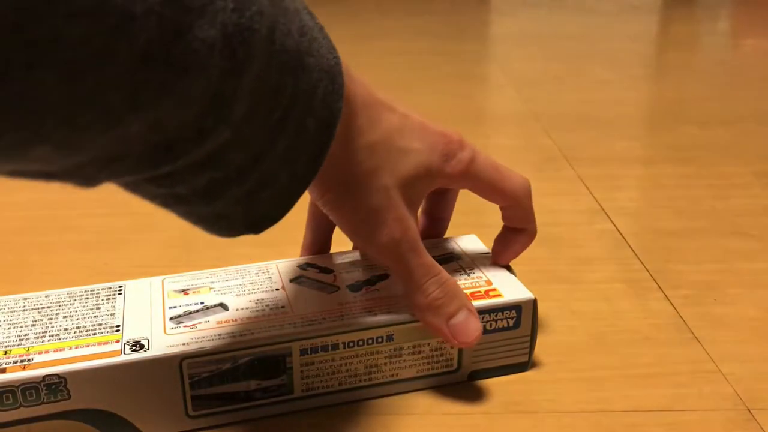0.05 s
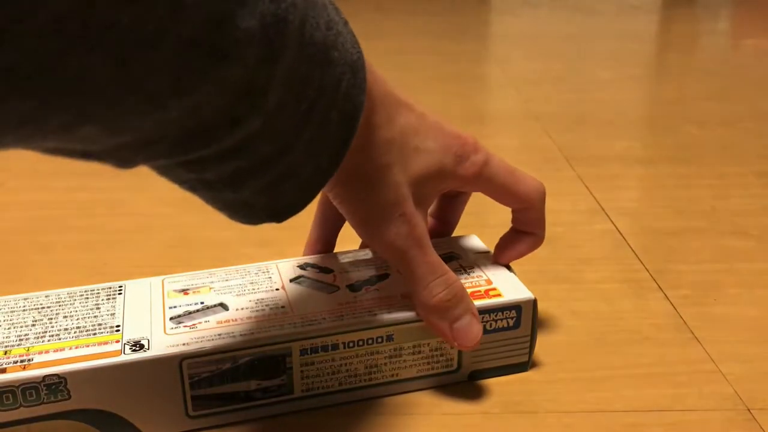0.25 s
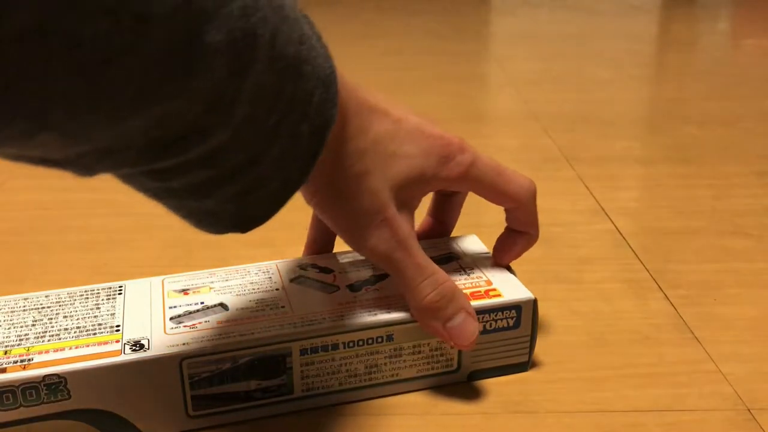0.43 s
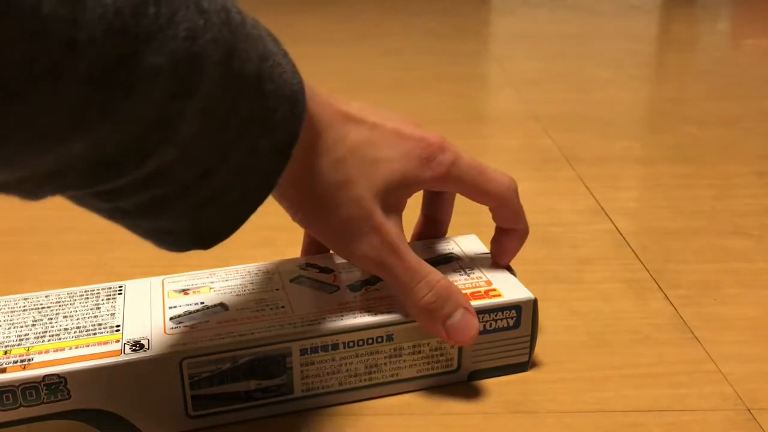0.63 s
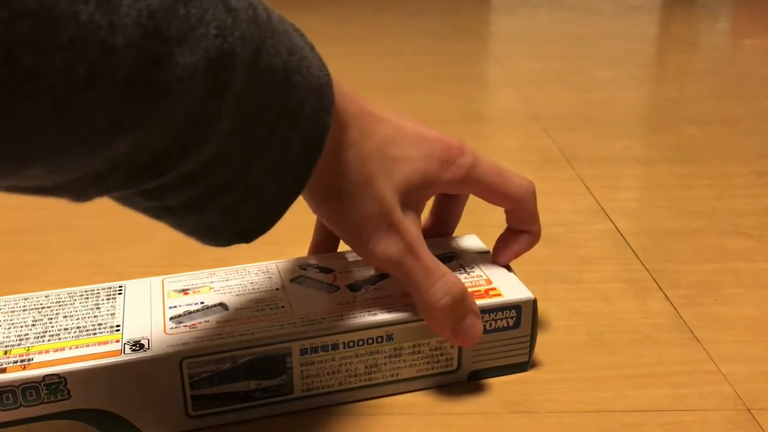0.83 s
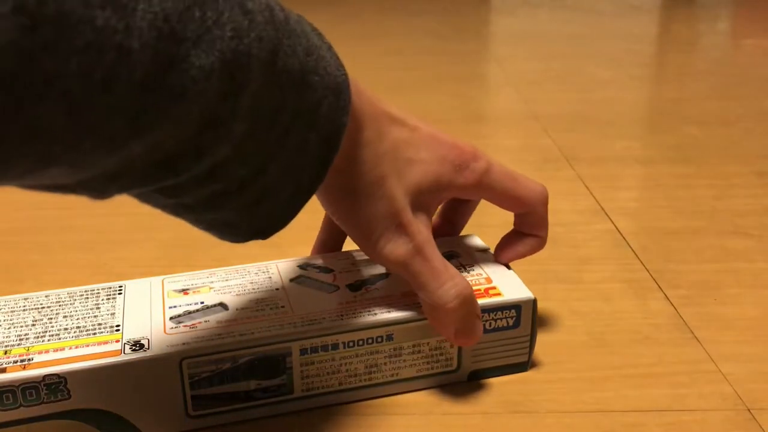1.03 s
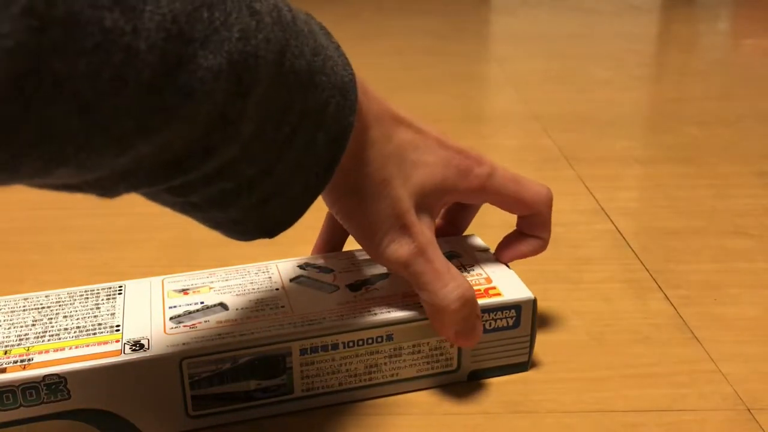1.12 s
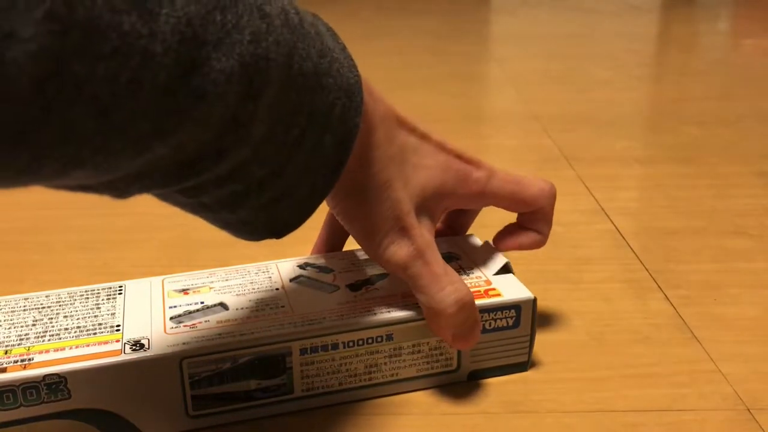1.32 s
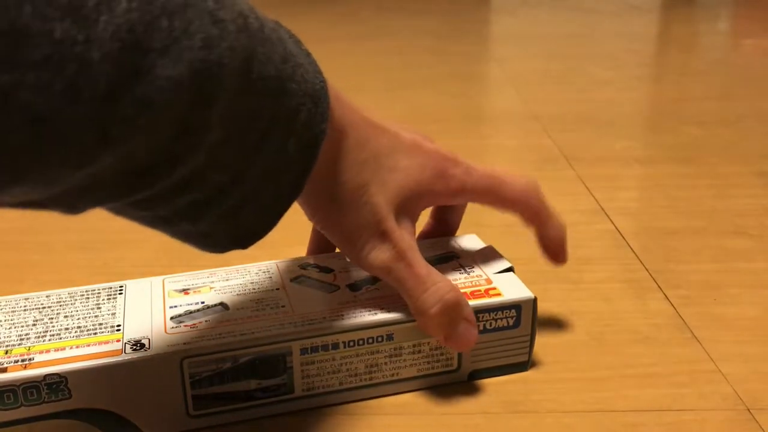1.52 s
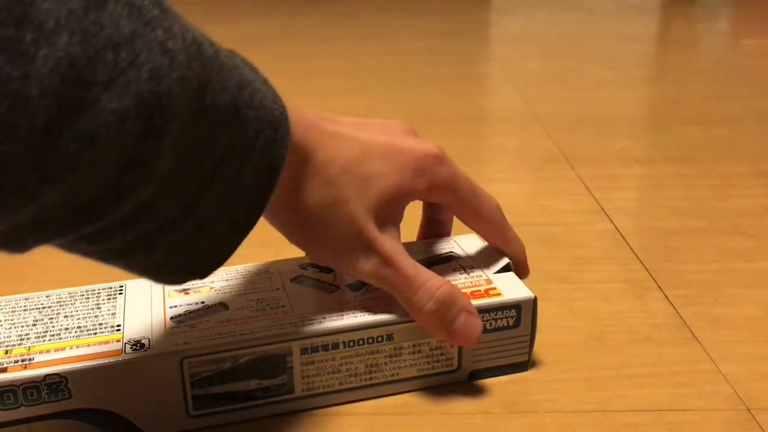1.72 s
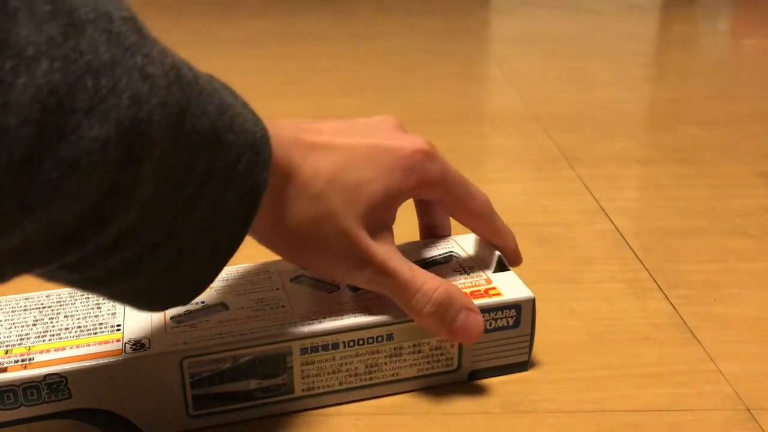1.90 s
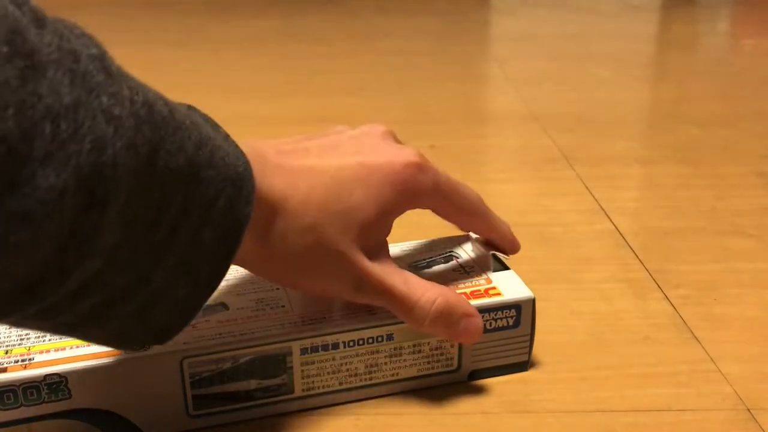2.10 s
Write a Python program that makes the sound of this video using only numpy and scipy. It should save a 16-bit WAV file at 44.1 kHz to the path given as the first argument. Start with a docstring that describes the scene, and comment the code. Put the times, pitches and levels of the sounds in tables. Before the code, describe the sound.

A perforated cardboard tab tears in a quick run of sharp, dry snaps under a thumb. It gives way with a hollow knock, then a finger faintly rubs and flicks the flap, close up in a quiet room.

```python
"""Opening a perforated cardboard tab

A thumb presses in the tab of a cardboard box on a wooden floor in a quiet room.
Fibres tick and the paper bridges snap one after another, each a bright burst ringing in the card.
The tab gives way and knocks the hollow box, then a finger slides along the flap and flicks it up.
A short room tail follows each sound, over faint air and low rumble."""
import sys
import numpy as np
from scipy import signal
from scipy.fft import rfft, irfft
from scipy.io import wavfile
from scipy.ndimage import uniform_filter1d, map_coordinates

SR = 44100
rng = np.random.default_rng(int(sys.argv[2]) if len(sys.argv) > 2 else 0)


def digitize_waveform(pressure):
    """Quantize a signal to 16-bit integers and store it at the path in sys.argv[1].

    Rows of a 2-D input are taken as channels; values are limited to [-1, 1].
    """
    field = np.atleast_2d(pressure).T
    bounded = np.clip(field, -1, 1)
    quanta = np.round(bounded * 32767).astype(np.int16)
    wavfile.write(sys.argv[1], SR, quanta)


N = 94815


def amp(db):
    """Decibels to gain."""
    return 10 ** (np.asarray(db) / 20)


def curve_at(points, hz):
    """A curve of (hz, value) points, read on a log-frequency axis."""
    point_hz, value = np.transpose(points)
    return np.interp(np.log(hz + 1), np.log(point_hz + 1), value)


def add(mix, start_s, sound):
    """Lays a sound into the mix."""
    part = mix[round(start_s * SR):][:len(sound)]
    part += sound[:len(part)]


def bins(size=2048):
    """The frequencies of a spectrum, in Hz."""
    return np.fft.rfftfreq(size, 1 / SR)


def noise(eq):
    """Steady noise shaped by an EQ curve, at rms 1."""
    shaped = irfft(rfft(rng.standard_normal(N)) * amp(curve_at(eq, bins(N))), N)
    return shaped / shaped.std()


def fibre_burst(eq_db, attack_s, hold_s, decay_s, size=2048):
    """A crowd of breaking fibres: a spike of noise rings through a minimum-phase EQ."""
    t = np.arange(size) / SR
    envelope = np.minimum(t / attack_s, 1) * np.exp(-np.maximum(t - hold_s, 0) / decay_s)
    spike = rng.standard_normal(size) * envelope
    for _ in range(4):  # flatten the spectrum, then restore the envelope
        spike = irfft(np.exp(1j * np.angle(rfft(spike))))
        spike = spike * envelope / np.sqrt(abs(uniform_filter1d(spike ** 2, size=32)) + 1e-12)
    log_gain = np.log(amp(np.r_[eq_db, eq_db[-2:0:-1]]))
    impulse = np.fft.ifft(np.exp(np.conj(signal.hilbert(log_gain)))).real
    return signal.fftconvolve(spike / np.linalg.norm(spike), impulse[:size // 2])


# Bright base tone of a snap: freq_hz, gain_db
SNAP_EQ = [(50, -34), (130, -18), (260, -10.5), (480, -22), (800, -23.5), (1450, -11.5), (2300, -13),
           (3300, -4.5), (7000, 0.5), (10400, -3), (13000, 0.5), (15500, -3.5)]
# One snap per paper bridge, with three card resonances:
# start_s, level_db, peak1_hz, peak1_db, peak2_hz, peak2_db, peak3_hz, peak3_db, decay_s, send_db
BRIDGE_SNAPS = [(0.2446, -2, 4040, 16, 7700, 5.7, 11970, 11, 0.00083, 4),
                (0.2513, -4, 3820, 20, 9100, 2.1, 13460, 14, 0.0012, 4),
                (0.3351, -3, 3793, 16.4, 9000, 11, 13040, 10, 0.0017, 5),
                (0.3602, -4, 3830, 18, 8740, 17, 12530, 11, 0.00092, -1.5),
                (0.4244, -2.5, 3630, 13, 8570, 11.6, 12900, 9.8, 0.00059, 2),
                (0.4542, 0.5, 3840, 1.7, 8450, 3.3, 13000, -1, 0.0017, 1.5),
                (0.4948, 0, 3400, 15.3, 7760, 1, 13400, 5.3, 0.0011, 3.5),
                (0.5211, -2, 3640, 17, 5600, 4, 12830, 6.6, 0.0011, 4),
                (0.5491, -1.5, 4550, 12, 7740, 2.3, 12500, 8, .001, 4),
                (0.5772, -1.5, 4600, 10, 7340, 6.9, 11600, 9, 0.0017, 4),
                (0.611, -4.5, 4550, 14.2, 6020, 13, 12800, 7.1, 0.0032, 7),
                (0.6466, -2, 5590, 12.2, 8100, 12.5, 14500, 1, 0.0022, 4),
                (0.7948, -4, 4250, 11, 5460, 4.2, 13100, 2.1, 0.0018, 7.5),
                (0.8249, -5.5, 5390, 8.9, 7160, 7.1, 13220, 5, .0017, 9),
                (.844, -5, 5040, 13.6, 6660, 3.3, 13200, 4.8, 0.0011, 5.5),
                (0.9051, -4.5, 5180, 9.1, 6840, 8.1, 13300, 6.2, 0.002, 7.5),
                (0.937, -6, 4320, 12.4, 6830, 7, 12440, 7, 0.0018, 5.5)]


def bridge_snaps():
    """Paper bridges break in a row and excite the card's resonances: returns direct and room send."""
    trim_db, attack_s, hold_s = 0.5, 0.00049, 0.0016
    peak_widths_hz, peak_send_share = (876, 900, 1200), 0.38
    ripple_db, ripple_step_hz = 2.5, 416.5  # chance peaks and dips make each snap different
    hz = bins()
    direct, send = np.zeros(N), np.zeros(N)
    for start_s, level_db, *card, decay_s, send_db in BRIDGE_SNAPS:
        base = trim_db + level_db + curve_at(SNAP_EQ, hz)
        peaks = sum(peak_db / (1 + ((hz - peak_hz) / width_hz) ** 2) ** 2
                    for peak_hz, peak_db, width_hz in zip(card[::2], card[1::2], peak_widths_hz))
        ripple = map_coordinates(rng.standard_normal(128), [hz / ripple_step_hz], mode="mirror")
        direct_eq = base + peaks + ripple_db * ripple
        send_eq = base + peak_send_share * peaks + send_db
        add(direct, start_s, fibre_burst(direct_eq, attack_s, hold_s, decay_s))
        add(send, start_s, fibre_burst(send_eq, attack_s, hold_s, decay_s))
    return direct, send


def box_ring(modes, attack_s, tilt_db=0, size=16384):
    """Struck box modes die away, each detuned by the grip; little radiates below the lowest."""
    detune, tilt_pivot_hz = 0.0117, 640
    t, out = np.arange(size) / SR, np.zeros(size)
    for pitch_hz, level_db, t60_s in modes:
        cycles = pitch_hz * (1 + detune * rng.standard_normal()) * t
        mode = (1 - np.exp(-t / attack_s)) * amp(-60 * t / t60_s) * np.sin(2 * np.pi * cycles)
        gain = amp(level_db + tilt_db * np.log2(pitch_hz / tilt_pivot_hz))
        out += gain * mode / np.linalg.norm(mode)
    low_cut = signal.butter(2, 0.93 * modes[0][0], "high", fs=SR, output="sos")
    return signal.sosfilt(low_cut, out)


# Box modes, as low thump, hollow body and papery panel: pitch_hz, level_db, t60_s
THUMP_MODES = [(71.4, -11.5, 0.35), (106, -12, 0.065), (142.7, -1.5, 0.041), (170, -8, 0.041),
               (198.7, -6, 0.12)]
BODY_MODES = [(408, -6.5, 0.076), (494.6, -1.5, 0.052), (556, 2, 0.054), (613, 1.5, 0.054), (695, -1, .04),
              (869, 0, 0.022), (961, -9, 0.1)]
PANEL_MODES = [(1374, -1, 0.019), (1645, -3, 0.026), (1932, 0.5, 0.011), (2388, -6, 0.011)]
# Mid bite and crisp top of a knock's crack: freq_hz, gain_db
CRACK_EQ = [(100, -39), (1000, -6), (2800, -9), (3500, -2.5), (4300, -3.5), (5300, -3), (6700, -0.5),
            (7800, -11), (10500, -17), (15500, -27)]
TOP_EQ = [(100, -61), (4000, -38), (8000, -4.5), (10000, -8), (11500, -11), (13500, -4), (16000, -9)]
# Flap hits, each with its own mix of layers, plus one small tick at 1.504 s that is almost only crack: #
# start_s, thump_db, body_db, body_tilt_db_per_octave, panel_db, crack_db, top_db
FLAP_KNOCKS = [(.917, -29, -10, -1, -12.5, -29, -26), (1.231, -43, -17, 10, -6, -21.5, -27),
               (1.239, -36, -7.5, -4, -14, -14, -26), (1.2551, -18, -14, 10, -2.5, -10.5, -8),
               (1.2576, -19, 4, 1, -2.5, -1, -10.5), (1.311, -25.5, -25, -4, -22, -23, -32),
               (1.3247, 5, 10.5, -0.5, 4, -6.5, -15.5), (1.504, -44, -46, 1, -46, -32.5, -55),
               (1.7955, -16, -7.5, 10, -7.5, -7, -9.5), (1.8032, -20, -28, 6.5, -19, -21, -34),
               (1.8361, -22, -4, -5, -1.5, -16.5, -21), (1.8637, -12, -17, 0, 1.5, -1.5, -17),
               (1.872, -13.5, -6, 1, -11, -19, -30)]


def flap_knocks():
    """The flap hits with a dry crack and sets the hollow box ringing: returns cracks and rings."""
    ring_trim_db = -17.5
    cracks, rings = np.zeros(N), np.zeros(N)
    for start_s, thump_db, body_db, tilt_db, panel_db, crack_db, top_db in FLAP_KNOCKS:
        thump = amp(thump_db) * box_ring(THUMP_MODES, attack_s=0.0028)
        body = amp(body_db) * box_ring(BODY_MODES, attack_s=0.0015, tilt_db=tilt_db)
        panel = amp(panel_db) * box_ring(PANEL_MODES, attack_s=0.0045)
        add(rings, start_s, thump + body + panel)
        bite = amp(crack_db + curve_at(CRACK_EQ, bins()))
        top = amp(top_db + curve_at(TOP_EQ, bins()))
        eq_db = 20 * np.log10(bite + top)
        add(cracks, start_s, fibre_burst(eq_db, attack_s=0.0003, hold_s=0.000603, decay_s=0.001))
    return cracks, amp(ring_trim_db) * rings


# Thin, sharp tone of a tick: freq_hz, gain_db
TICK_EQ = [(100, -32), (900, -23), (2000, -10), (3700, 5), (7000, -3), (10000, 0), (15000, -8.5)]
# Small fibre cracks: start_s, level_db
FIBRE_TICKS = [(0.1249, -38.5), (.1622, -38), (.172, -57), (0.182, -47), (.2172, -39.5), (0.2225, -38.5),
               (.251, -5.5), (.359, -3.5), (0.4224, -6.5), (0.6477, -14), (0.796, -23), (1.0413, -31),
               (1.603, -45.5), (1.74, -38)]


def fibre_ticks():
    """Single fibres give way under the thumb."""
    out = np.zeros(N)
    for start_s, level_db in FIBRE_TICKS:
        tick = fibre_burst(curve_at(TICK_EQ, bins()), attack_s=0.00025, hold_s=0.00017, decay_s=0.0018)
        add(out, start_s, amp(level_db) * tick)
    return out


# Boxy rustle and fine hiss of skin on card: freq_hz, gain_db
RUSTLE_EQ = [(60, -6.5), (300, -5), (600, 3.5), (1000, -1.5), (1400, -1), (2000, -4.5), (3200, -10.5),
             (16000, -53.5)]
HISS_EQ = [(100, -25), (1500, -2.5), (3500, -8), (6700, -2.5), (9000, -12), (13000, -10.5), (16000, -9.5)]
# Finger strokes: start_s, length_s, rustle_db, hiss_db
FINGER_RUBS = [(1.108, 0.085, -67.5, -85), (1.25, 0.075, -55, -64), (1.641, 0.17, -62.5, -66),
               (1.711, 0.057, -67, -81), (1.814, 0.086, -55.5, -86), (1.992, 0.11, -74.5, -72.5)]


def finger_rubs():
    """Skin catches and slips along the card, giving a grainy rustle and hiss."""
    fade_s, catch_s, grain_db = 0.029, 0.0046, 3
    t, out = np.arange(N) / SR, np.zeros(N)
    rustle, hiss = noise(RUSTLE_EQ), noise(HISS_EQ)
    grain = map_coordinates(rng.standard_normal(2048), [t / catch_s], mode="mirror")
    for start_s, length_s, rustle_db, hiss_db in FINGER_RUBS:
        envelope = np.clip(np.minimum(t - start_s, start_s + length_s - t) / fade_s, 0, 1)
        out += envelope * (amp(rustle_db) * rustle + amp(hiss_db) * hiss)
    return out * amp(grain_db * grain)


# Reverb time: freq_hz, t60_s
REVERB_DECAY = [(100, 0.23), (500, 0.34), (2000, 0.3), (5000, 0.37), (9000, 0.23), (15000, 0.28)]
# Tone of the tail: freq_hz, gain_db
REVERB_EQ = [(100, -5), (230, 2.5), (500, -14.5), (2000, -8.5), (5000, -11.5), (9000, -7), (15000, -15)]
# Early reflections: delay_s, gain
REFLECTIONS = [(.0034, 0.12), (.0052, .12), (0.0119, 0.16), (0.0172, .09)]


def room_reverb(send):
    """A few echoes from floor and furniture, then a short diffuse tail."""
    build_s = 0.0091
    hz, t, spectrum = signal.stft(rng.standard_normal(SR), SR, nperseg=256)
    t60_s = curve_at(REVERB_DECAY, hz)[:, None]
    decay = amp(curve_at(REVERB_EQ, hz)[:, None] - 60 * t / t60_s)
    energy_trim = np.sqrt(2 * np.log(1000) / (t60_s * SR))  # a longer decay adds no energy
    impulse = signal.istft(spectrum * decay * energy_trim, SR, nperseg=256)[1][:SR]
    impulse *= np.minimum(np.arange(SR) / SR / build_s, 1)
    for delay_s, gain in REFLECTIONS:
        add(impulse, delay_s, np.array([gain]))
    return signal.fftconvolve(send, impulse)[:N]


# Soft air and low rumble of the room: freq_hz, gain_db
AIR_EQ = [(88, -32), (150, -1.5), (601, -11), (805, -13), (998, -13), (2100, -19), (3290, -22.5),
          (4860, -24.5), (6770, -26), (16000, -30)]
RUMBLE_EQ = [(20, -31), (35, -20.5), (55, -4), (70, -5.5), (85, -1), (110, -10.5), (160, -15), (300, -38),
             (1000, -70.5)]


def room_tone():
    """A faint, steady bed of still air and rumble."""
    return amp(-70.5) * noise(AIR_EQ) + amp(-69) * noise(RUMBLE_EQ)


def scene():
    """Mono mix of the box, its reverb and the room tone."""
    snaps, snap_send = bridge_snaps()
    cracks, rings = flap_knocks()
    box = fibre_ticks() + rings + finger_rubs()
    bed = room_tone()
    reverb = room_reverb(snap_send + amp(-3.5) * cracks + box)
    return (snaps + cracks + box + reverb + bed)[None]


def record(dry):
    """The microphone's bass roll-off and the band limit."""
    low_cut_hz, high_cut_hz = 22, 16100
    low_cut = signal.butter(3, low_cut_hz, "high", fs=SR, output="sos")
    high_cut = signal.firwin(255, high_cut_hz, window=("kaiser", 8), fs=SR)
    return signal.oaconvolve(signal.sosfilt(low_cut, dry), high_cut[None], "same")


dry = scene()
out = record(dry)
digitize_waveform(out)
```